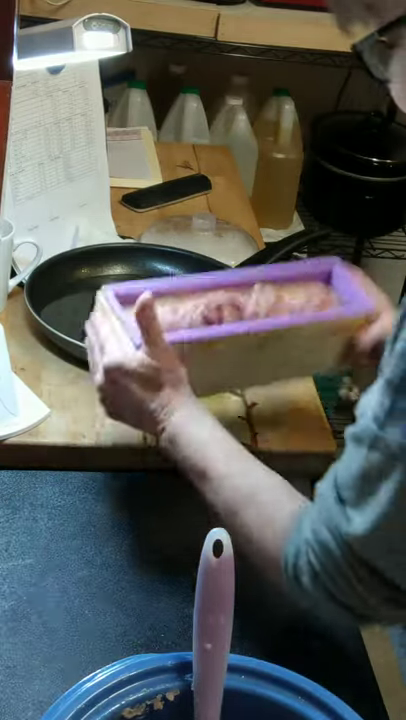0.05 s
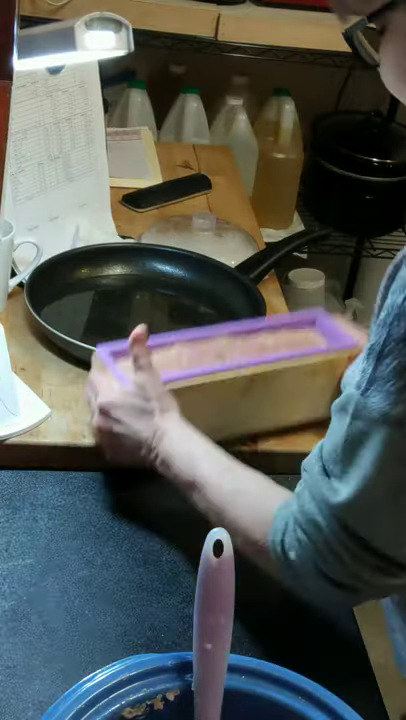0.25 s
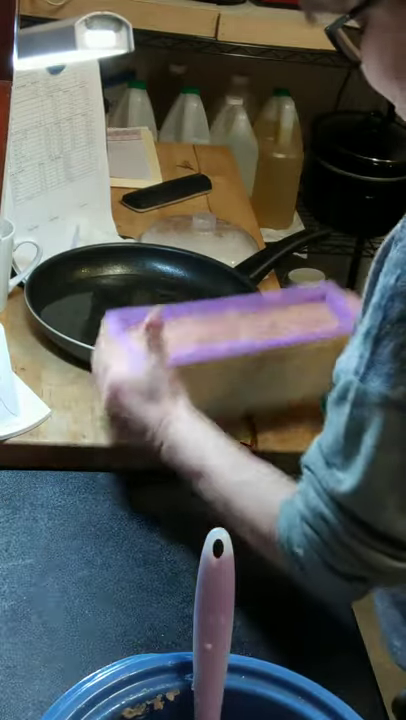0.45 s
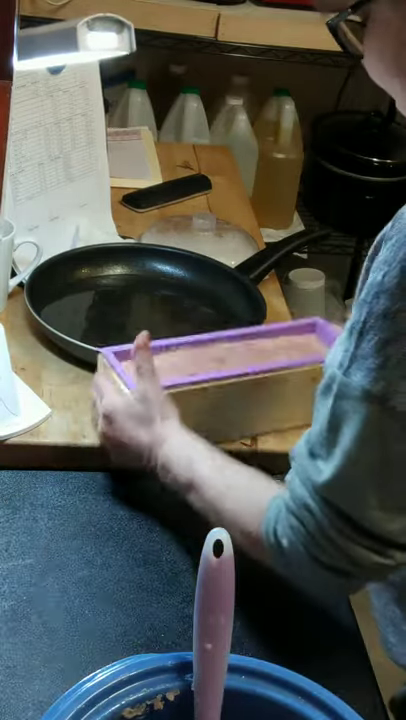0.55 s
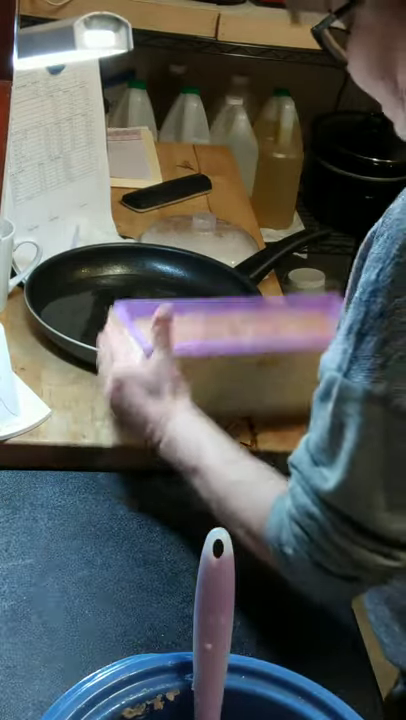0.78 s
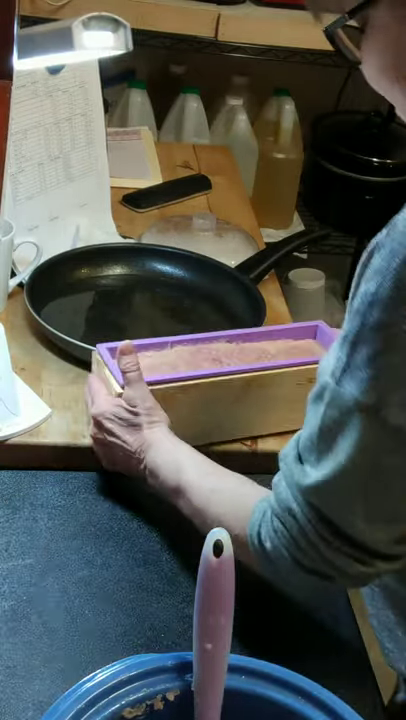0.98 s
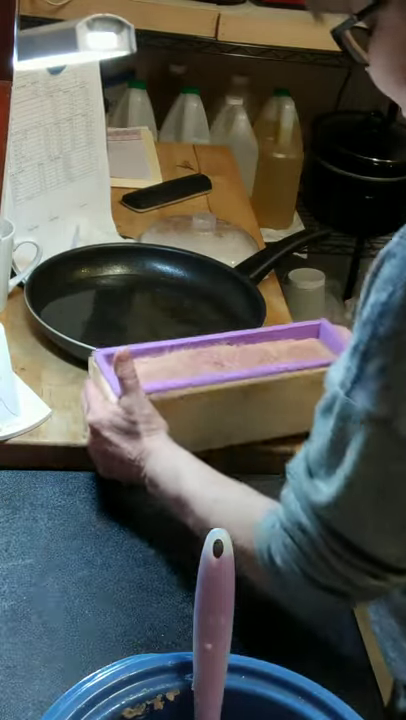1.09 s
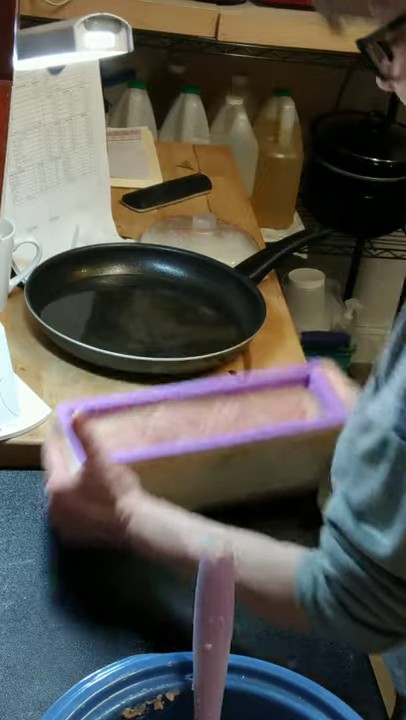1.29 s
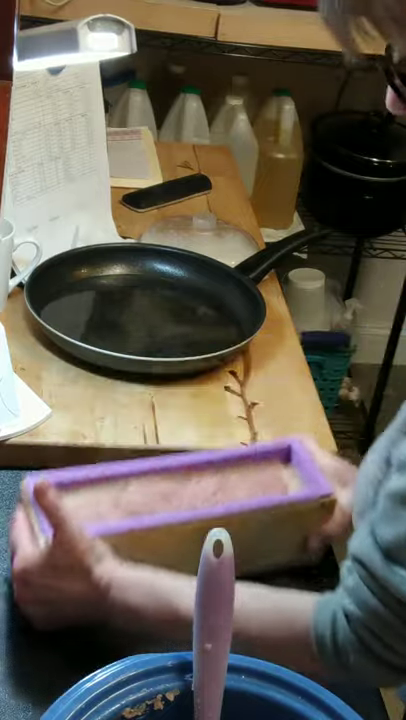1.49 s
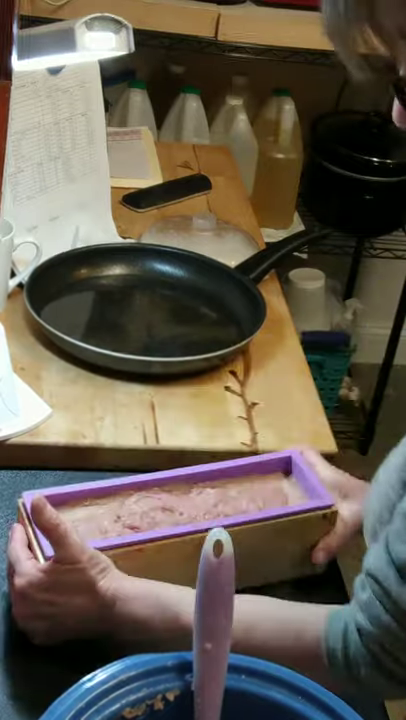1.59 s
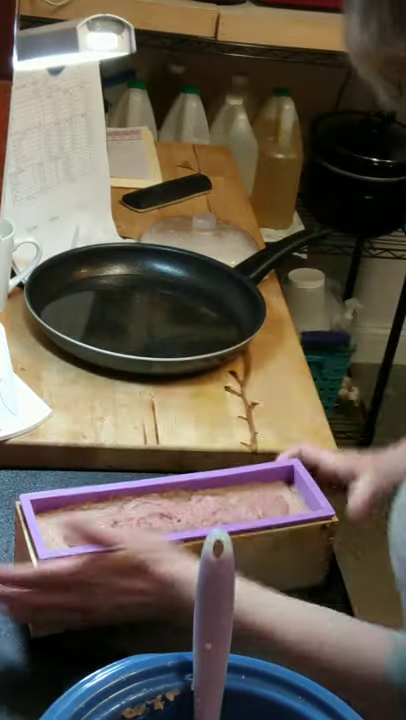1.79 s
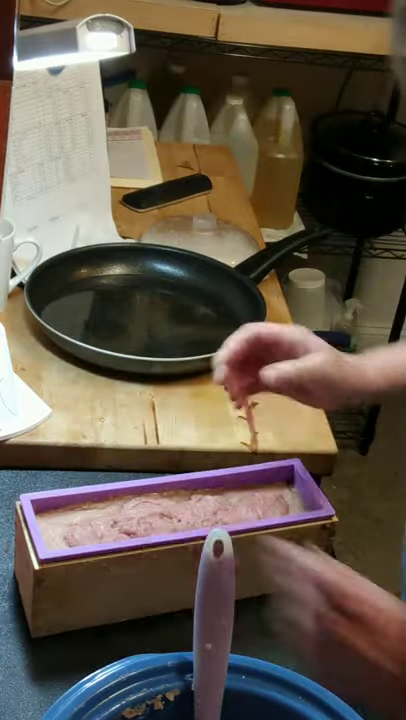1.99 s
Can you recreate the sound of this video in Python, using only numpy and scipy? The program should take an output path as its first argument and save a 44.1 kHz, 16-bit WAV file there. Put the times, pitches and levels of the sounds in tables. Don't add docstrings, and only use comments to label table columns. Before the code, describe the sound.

A wooden mold heavy with batter bangs three times on a wooden table, each a quick cluster of corner knocks, then thuds softly onto a padded counter; small room, close phone microphone, quiet hiss.

```python
import sys
import numpy as np
from scipy import signal
from scipy.fft import rfft, irfft, next_fast_len
from scipy.io import wavfile
from scipy.ndimage import map_coordinates

SR = 44100
rng = np.random.default_rng(int(sys.argv[2]) if len(sys.argv) > 2 else 0)


def voltage_ratio(decibels):
    exponent = np.asarray(decibels, float) / 20
    return 10 ** exponent


def to_wav(sig):
    pcm = np.clip(np.atleast_2d(sig), -1, 1) * 32767
    pcm = np.round(pcm).astype(np.int16)
    wavfile.write(sys.argv[1], SR, pcm.T)


N = 90404

RISE_S, SOFT_RISE_S = 0.00046, 0.0013
MODE_SCATTER_DB, PITCH_SCATTER = 2.5, 0.006


def along(points, hz):
    f, v = np.transpose(points)
    return np.interp(np.log(hz + 1), np.log(f + 1), v)


def filtered(x, response):
    m = next_fast_len(len(x) + 8192)
    hz = np.fft.rfftfreq(m, 1 / SR)
    return irfft(rfft(x, m) * response(hz), m)[:len(x)]


def noise(spectrum, size):
    x = filtered(rng.standard_normal(size), lambda hz: voltage_ratio(along(spectrum, hz)))
    return x / x.std()


def add(x, s, part):
    i = round(s * SR)
    x[i:i + len(part)] += part[:len(x) - i]


def ring(modes, rise_s):
    t = np.arange(SR // 2) / SR
    hz, db, t60 = np.transpose(modes)[..., None]
    db = db + MODE_SCATTER_DB * rng.standard_normal(db.shape)
    hz = hz * (1 + PITCH_SCATTER * rng.standard_normal(hz.shape))
    rings = voltage_ratio(db - 60 * t / t60) * np.sin(2 * np.pi * hz * t)
    return -rings.sum(0) * (1 - np.exp(-t / rise_s))


def burst(spectrum, t60, rise_s):
    t = np.arange(SR // 4) / SR
    return noise(spectrum, len(t)) * voltage_ratio(-60 * t / t60) * (1 - np.exp(-t / rise_s))


# hz, t60_s
ROOM = [(100, 0.5), (300, .33), (1000, 0.28), (3000, .3), (9000, 0.18), (13000, .078)]
# hz, level_db
ROOM_DB = [(100, -2.5), (300, -7), (1000, -7), (3000, -11), (9000, -9)]


def room(x, wet_db=0):
    hz, t, z = signal.stft(rng.standard_normal(SR // 2), SR, nperseg=256)
    t60 = along(ROOM, hz)[:, None]
    decay = voltage_ratio(along(ROOM_DB, hz)[:, None] - 60 * t / t60)
    decay = decay / np.sqrt(t60 * SR / 14)
    tail = signal.istft(z * decay, SR, nperseg=256)[1]
    direct = np.pad(x, (0, len(tail) + 199))
    answer = np.pad(signal.fftconvolve(x, tail), (200, 0))
    return direct + voltage_ratio(wet_db) * answer


# hz, level_db_per_hz
HISS = [(12, -28.5), (20, -28.5), (65, 0.5), (241, -19), (301, -18), (607, -22), (897, -24.5),
        (1060, -24.5), (16000, -40)]


def hiss():
    return voltage_ratio(-64.5) * noise(HISS, N)


# hz, level_db_per_hz
TICK = [(2000, -30), (4800, -3), (6500, -11), (8300, -0.5), (11000, -30.5)]


def ticks():
    out = np.zeros(N)
    first_s, every_s = 0.01, 0.04
    for s in np.arange(first_s, N / SR, every_s):
        level_db = -69.5 + rng.normal(0, 1.4)
        add(out, s - 0.002, voltage_ratio(level_db) * burst(TICK, t60=0.024, rise_s=0.00044))
    return out


# pitch_hz, level_db, t60_s
MOLD = [(997.5, 3, .04), (1075, -0.5, 0.029), (1180, 1, .06), (1307, -3, 0.074), (1455, -7, .063),
        (1530, -10, .045), (1718, -7, 0.068), (2004, -6, 0.06), (2280, -15.5, .03), (2400, -14.5, .025),
        (2740, -12.5, .029), (3120, -14, 0.043)]
# pitch_hz, level_db, t60_s
BASE = [(393, 0, .06), (447.4, -5, 0.12), (554.5, -2.5, 0.067), (589.7, 0.5, .06), (683, 0, 0.063),
        (793, -3, 0.075)]
# pitch_hz, level_db, t60_s
TABLE = [(124.44, -11, 0.049), (174.5, -0.5, 0.069), (211, -4.5, 0.069), (240, -1, 0.057),
         (282.8, -1, 0.066)]
# hz, level_db_per_hz
CRACK = [(880, -33), (1500, -12), (2300, 1.5), (2740, -8.5), (3250, -9.5), (4330, -10), (8570, -13),
         (16000, -64.5)]
# start_s, wall_db, base_db, thud_db, crack_db
BANGS = [(0.2465, -22, -23.5, -22.5, -26.5), (0.2500, -15.5, -22.5, -27.5, -20.5),
         (0.2512, -17, -24.5, -31, -20.5), (0.2570, -24, -20.5, -17, -31.5),
         (0.5973, -26, -21.5, -24.5, -31.5), (0.6003, -28, -27, -25.5, -34),
         (0.6123, -27, -22.5, -27.5, -31.5), (0.619, -26.5, -26, -24, -39.5),
         (0.9255, -26.5, -22.5, -26, -27), (0.9364, -23, -25, -26.5, -24), (.940, -26, -23.5, -29, -19.5),
         (.944, -24.5, -28.5, -30.5, -21.5), (0.948, -24.5, -27.5, -30, -35.5)]


def bangs():
    out = np.zeros(N)
    for s, wall_db, base_db, thud_db, crack_db in BANGS:
        blow = voltage_ratio(wall_db - 4) * ring(MOLD, RISE_S)
        blow += voltage_ratio(base_db - 4) * ring(BASE, RISE_S)
        blow += voltage_ratio(thud_db - 2.5) * ring(TABLE, SOFT_RISE_S)
        blow_crack = burst(CRACK, t60=0.022, rise_s=RISE_S)
        add(blow, 0, voltage_ratio(crack_db) * blow_crack)
        add(out, s, room(blow))
    return out


# hz, level_db_per_hz
SHUDDER = [(120, -40.5), (300, -3.5), (400, 1), (800, -3.5), (1500, -4.5), (3200, -17), (6000, -32),
           (12000, -60)]
# start_s, level_db, t60_s
SHUDDERS = [
    (.249, -28, .28),
    (.599, -29, 0.27),
    (.927, -31, .28),
    (1.635, -51, 0.28),
    (1.724, -52, .1),
]


def shudders():
    out = np.zeros(N)
    for s, db, t60 in SHUDDERS:
        add(out, s, voltage_ratio(db) * burst(SHUDDER, t60, rise_s=0.005))
    return out


# start_s, level_db, pitch_hz, t60_s
KNOCKS = [(0.2493, -8.5, 1106, 0.029), (.2505, -15.5, 2040, 0.029), (0.25, -19.5, 1500, 0.06),
          (0.2557, -11, 241, 0.075), (0.598, -8, 1045, 0.048), (0.5984, -15, 1452, 0.038),
          (.606, -21, 1003, .03), (.613, -15, 1354, 0.042), (.613, -17, 547, 0.075),
          (.618, -11, 264, 0.047), (0.9243, -10.5, 1110, .04), (.927, -18, 210, 0.057),
          (.935, -12.5, 594, 0.047), (0.9381, -8.5, 1197, 0.037), (0.936, -22.5, 2728, .09),
          (0.946, -19.5, 1002, 0.046), (.947, -19.5, 583, 0.034), (.986, -34.5, 1180, 0.14)]


def knocks():
    out, t = np.zeros(N), np.arange(SR // 4) / SR
    rise_s, damping = 0.0015, 0.71
    swell = 1 - np.exp(-(t / rise_s) ** 2)
    for s, db, hz, t60 in KNOCKS:
        decay = voltage_ratio(db - 60 * t / t60 / damping)
        add(out, s, -decay * swell * np.sin(2 * np.pi * hz * t))
    return room(out, wet_db=-8)[:N]


# pitch_hz, level_db, t60_s
METAL = [(797, -55, .7), (1190, -55, .28), (1798, -58, 1.15)]
# pitch_hz, level_db, t60_s
SHELF = [(160, -4, 0.73), (211, 1, 1), (256, -2, 0.76), (366, -8.5, 1)]
# start_s, pan_db, shelf_db
METAL_HITS = [
    (.254, 0, -58),
    (.609, -1, -50),
    (.942, 0, -44),
]


def metal():
    out, t = np.zeros(N), np.arange(SR) / SR
    swell = 1 - np.exp(-t / 0.018)
    for s, pan_db, shelf_db in METAL_HITS:
        for modes, hit_db, waver_rad in ((METAL, pan_db, 0.39), (SHELF, shelf_db, 1.5)):
            hz, db, t60 = np.transpose(modes)[..., None]
            drift = rng.standard_normal((len(hz), 34))
            places = np.broadcast_arrays(np.arange(len(hz))[:, None], 30 * t)
            phase = waver_rad * map_coordinates(drift, places)
            rings = voltage_ratio(hit_db + db - 60 * t / t60) * np.sin(2 * np.pi * hz * t + phase)
            add(out, s, rings.sum(0) * swell)
    return out


# start_s, level_db, pitch_hz, t60_s
BOOMS = [(.262, -33.5, 50.8, 0.32), (.358, -42.5, 99.44, 0.21), (0.427, -49.5, 55.7, 0.35),
         (0.629, -36, 51.3, 0.25), (0.654, -37, 98.8, 0.11), (.749, -44.5, 71, .16), (.83, -49, 64.3, .14),
         (0.953, -39, 58.3, 0.28), (1.041, -44.5, 89.3, .24), (1.132, -43, 56.4, 0.23),
         (1.169, -52, 88, .2), (1.634, -31, 71, .15), (1.685, -38, 110, 0.13), (1.722, -42.5, 100.4, 0.091),
         (1.749, -38.5, 92, 0.063), (1.786, -44, 82, 0.081), (1.808, -53, 110, .1), (1.865, -59, 59.8, .12),
         (1.889, -56.5, 90, 0.086)]


def booms():
    out, t = np.zeros(N), np.arange(SR // 2) / SR
    for s, db, hz, t60 in BOOMS:
        swell = 1 - np.exp(-(t / (0.1 * t60)) ** 2)
        decay = voltage_ratio(db + 13 - 60 * t / t60)
        add(out, s, decay * swell * np.sin(2 * np.pi * hz * t))
    return out


# hz, level_db_per_hz
RUSTLE = [(530, -24.5), (900, -12.5), (1880, -6), (2110, -7), (5850, -10), (14000, -33)]
# start_s, level_db, length_s
RUSTLES = [
    (1.848, -60, 0.013),
    (1.872, -67, .02),
    (1.952, -79, .015),
    (.81, -68.5, .08),
    (0.54, -70, 0.016),
    (.33, -67, .17),
    (0.78, -69, 0.17),
    (1.9, -76.5, .037),
    (1.0, -68, .12),
]


def rustles():
    out, t = np.zeros(N), np.arange(SR // 4) / SR
    for s, db, length in RUSTLES:
        steps = rng.standard_normal(len(t) // 128 + 1)
        grain = voltage_ratio(2.3 * np.repeat(steps, 128)[:len(t)])
        shape = np.sin(np.pi * np.clip(t / length, 0, 1) ** 0.5)
        add(out, s, room(voltage_ratio(db) * shape * grain * noise(RUSTLE, len(t))))
    return out


# start_s, level_db, pitch_hz, length_s, width_hz
RATTLES = [(.35, -70, 8250, .12, 450), (.39, -71, 3150, .035, 150), (.44, -78, 4700, .05, 200),
           (.68, -70, 3150, .06, 150), (.68, -74, 4450, .04, 100), (.77, -75, 4450, .04, 80),
           (.68, -77, 8400, .15, 800), (.815, -74, 2550, .055, 200), (.815, -78, 5900, .03, 150),
           (.87, -76, 5950, .022, 150), (.68, -86, 11800, .04, 40), (1.01, -84, 11800, .045, 40),
           (1.0, -70, 4700, .045, 150), (1.01, -67, 3200, .045, 150), (1.03, -75, 8400, .06, 600),
           (1.848, -67, 2150, .012, 250), (1.872, -66, 2250, .013, 300), (1.872, -70, 5900, .016, 200),
           (1.872, -72, 3950, .01, 300), (1.953, -73, 4600, .011, 120)]


def rattles():
    out, t = np.zeros(N), np.arange(SR // 4) / SR
    for s, db, hz, length, width in RATTLES:
        buzz = filtered(rng.standard_normal(len(t)), lambda f: np.exp(-((f - hz) / width) ** 2))
        shape = np.sin(np.pi * np.clip(t / length / 1.3, 0, 1) ** 0.7)
        add(out, s, voltage_ratio(db) * shape * buzz / buzz.std())
    return out


# pitch_hz, level_db, t60_s
COUNTER = [(110, -9, 0.072), (156.4, -11.5, 0.078), (232.7, -1.5, .1), (295, -18, 0.083),
           (378.5, -13, 0.099), (477, -21.5, 0.11)]
# hz, level_db_per_hz
SLAP = [(290, -48), (500, -6.5), (831, -8.5), (2130, -24.5), (3440, -17.5), (8090, -28.5), (16000, -67)]
# start_s, thud_db, slap_db
LANDINGS = [
    (1.617, -23, -49),
    (1.633, -29.5, -31),
    (1.6463, -23, -40.5),
    (1.691, -35.5, -79.5),
    (1.712, -33, -72.5),
    (1.723, -42.5, -52),
    (1.788, -58, -77.5),
]


def landings():
    out = np.zeros(N)
    for s, thud_db, slap_db in LANDINGS:
        blow = voltage_ratio(thud_db) * ring(COUNTER, SOFT_RISE_S)
        add(blow, 0, voltage_ratio(slap_db) * burst(SLAP, t60=0.072, rise_s=0.0053))
        add(out, s, room(blow, wet_db=-9.5))
    return out


# start_s, length_s, level_db
SPREADS = [
    (0.596, .045, -9),
    (0.931, 0.022, -5.5),
    (1.628, 0.025, -8),
]


def treble_spread(mid):
    t = np.arange(N) / SR
    gate = np.zeros(N)
    for s, length, db in SPREADS:
        to_edge_s = np.minimum(t - s, s + length - t)
        gate += voltage_ratio(db) * np.clip(to_edge_s / 0.0072, 0, 1)
    return gate * filtered(mid, lambda hz: (hz > 4400) * np.exp(1j * hz / 300))


def scene():
    mid = hiss() + ticks()
    mid += bangs() + shudders() + knocks()
    mid += metal() + booms() + rustles() + rattles()
    mid += landings()
    side = treble_spread(mid)
    return np.array([mid + side, mid - side])


def roll_off(x):
    return signal.sosfilt(signal.butter(12, 16170, fs=SR, output="sos"), x)


def record(dry):
    low_hz, top_hz = 34.4, 16050
    mic = lambda hz: (hz < top_hz) * (1j * hz / (low_hz + 1j * hz)) ** 2
    mix = np.array([filtered(channel, mic) for channel in dry])
    return roll_off(mix)


dry = scene()
out = record(dry)
to_wav(out)
```